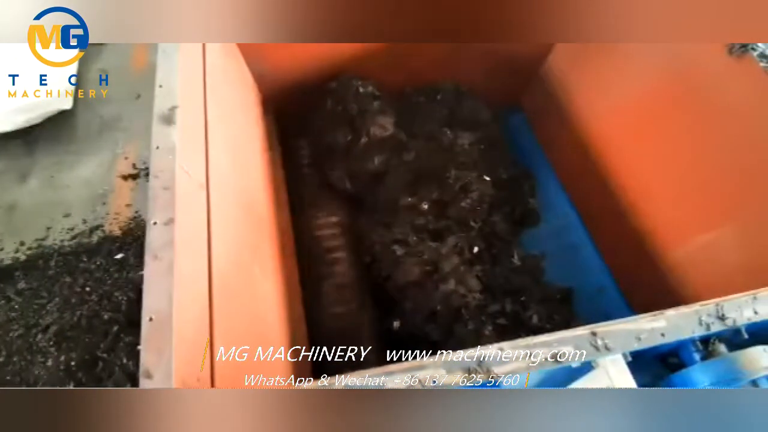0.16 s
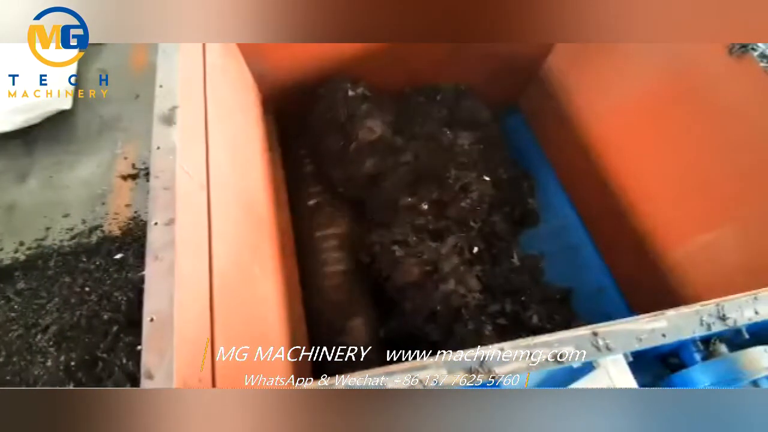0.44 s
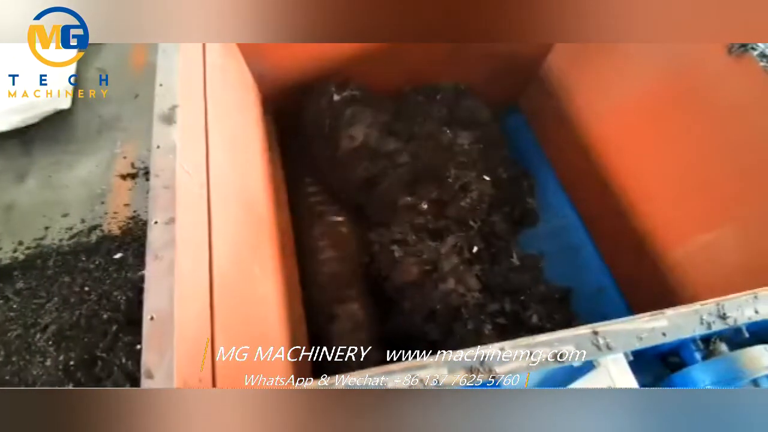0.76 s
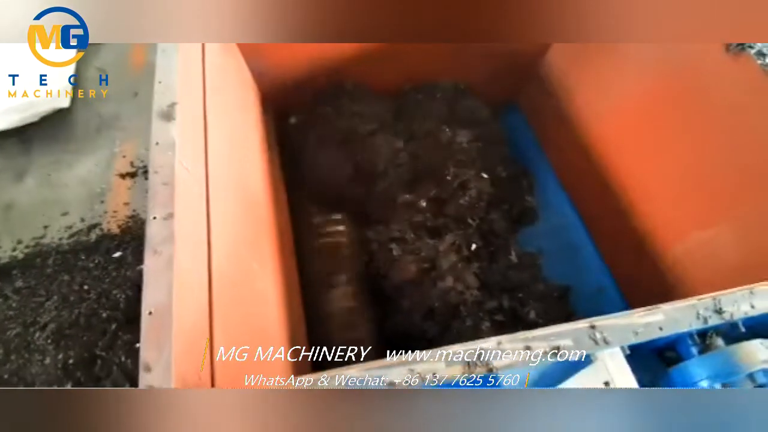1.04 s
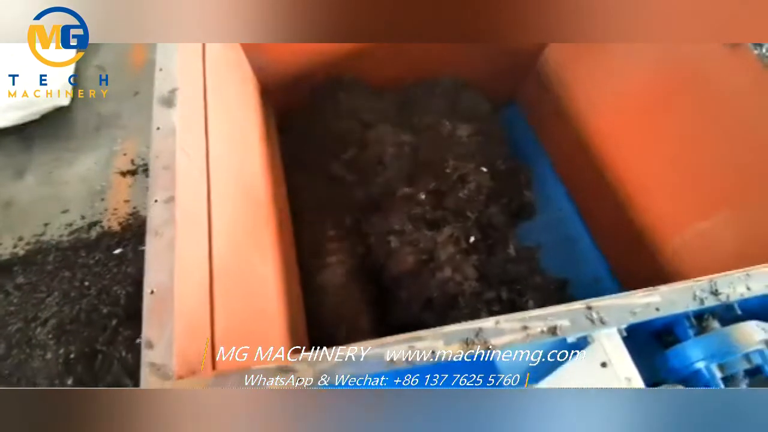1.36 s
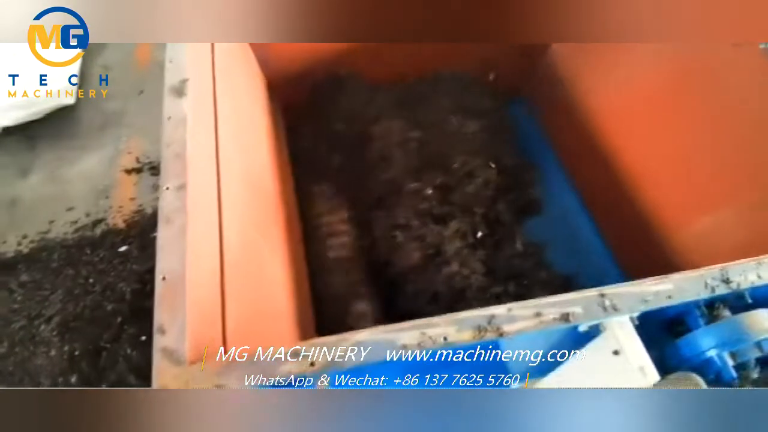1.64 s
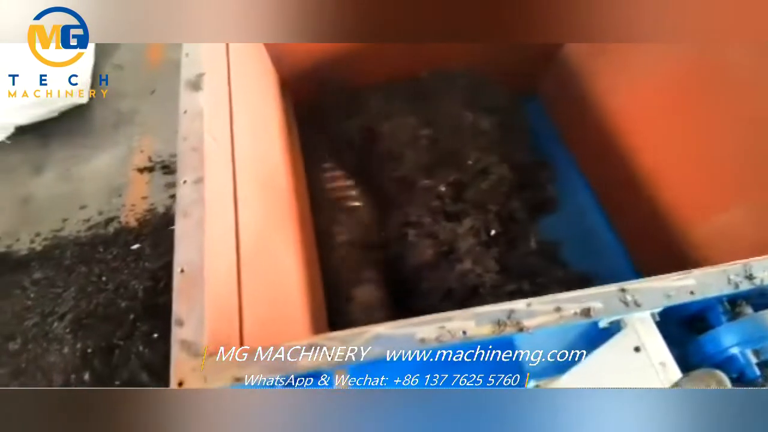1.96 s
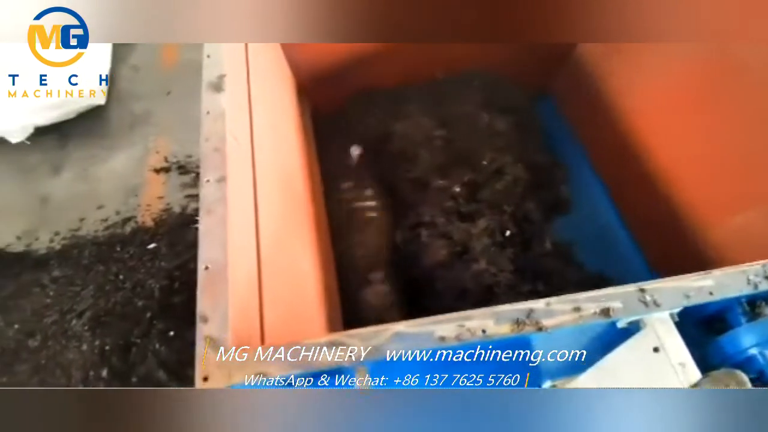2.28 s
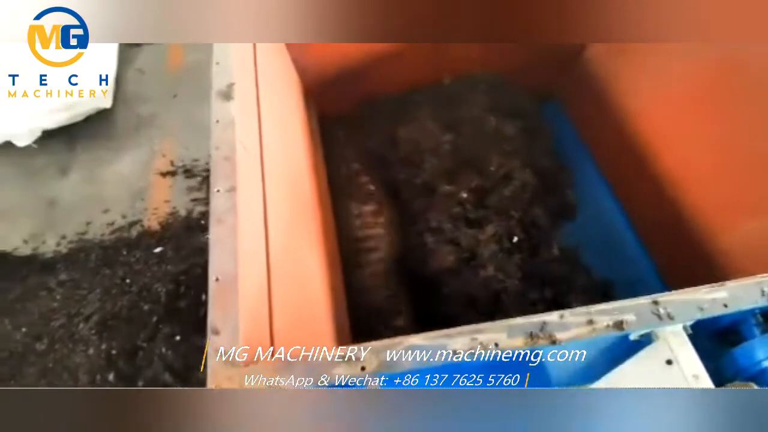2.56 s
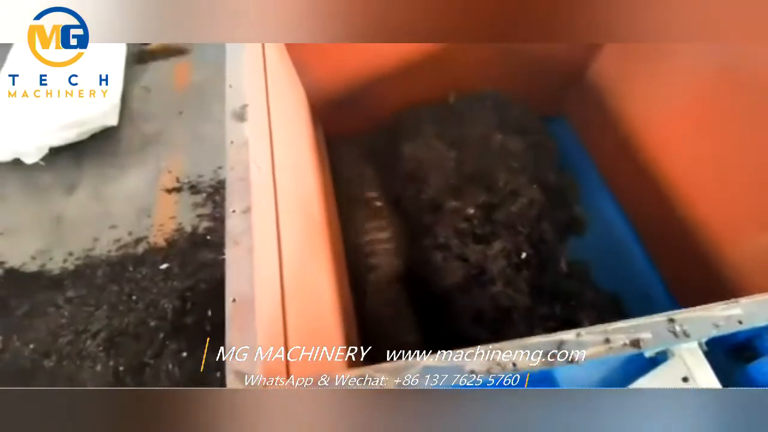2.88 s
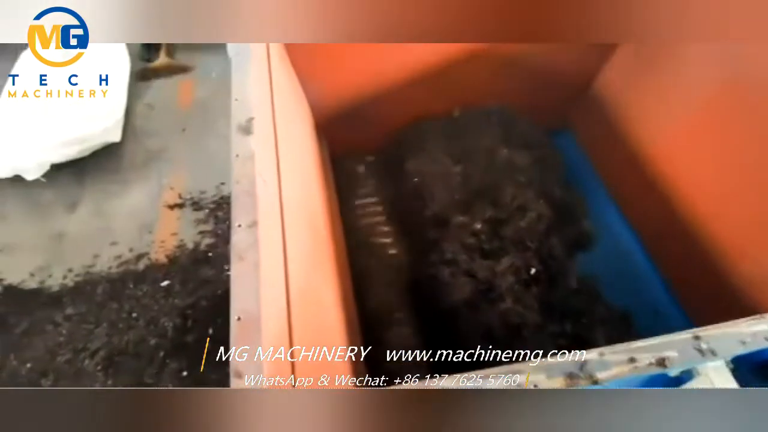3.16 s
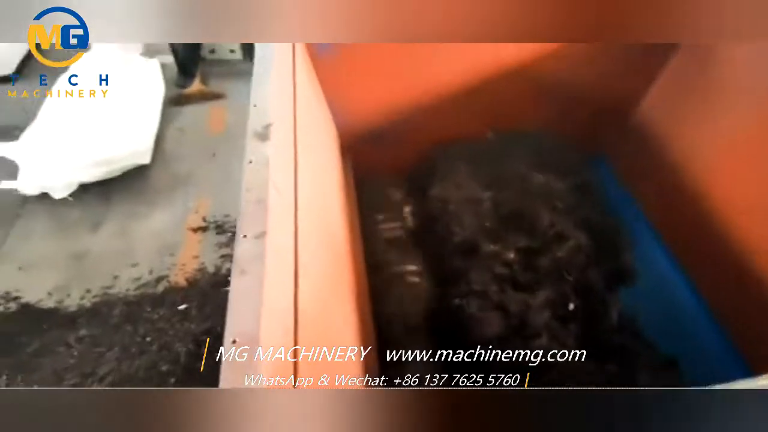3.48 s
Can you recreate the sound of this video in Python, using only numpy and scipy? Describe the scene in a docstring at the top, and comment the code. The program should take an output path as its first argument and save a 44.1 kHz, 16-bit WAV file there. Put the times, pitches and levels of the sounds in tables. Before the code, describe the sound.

Close, gritty roar of an industrial shredder, with sharp random cracks and dull knocks of material.

```python
"""Shredder at close range

A single-rotor shredder runs in a workshop, heard close above the hopper through two hand-held ports.
Noise rumbles in the housing and hisses as six knife rows a turn grind chips; sines make gear buzz and whine.
Lumps crack on the knives (bright noise bursts), some thud on the hopper (decaying sines) and one rubs its wall
(narrow noise). The ports colour grinding, buzz and cracks; a limiter ducks everything around loud peaks."""
import sys
import numpy as np
from scipy import signal
from scipy.fft import rfft, irfft, next_fast_len
from scipy.io import wavfile
from scipy.ndimage import minimum_filter1d

SR = 44100
rng = np.random.default_rng(int(sys.argv[2]) if len(sys.argv) > 2 else 0)


def to_wav(s):
    """Save 16-bit WAV."""
    ch = np.atleast_2d(s).T  # columns
    pcm = np.round(np.clip(ch, -1, 1) * 32767)  # PCM
    wavfile.write(sys.argv[1], SR, pcm.astype(np.int16))


N = 159642
TIME_S = np.arange(N) / SR
TURNS_PER_S = 5.835

# Treble colour of the two ports. Each row: frequency in Hz, left gain in dB, right gain in dB.
PORT_COLOUR = [(685, -33, -31), (1130, -12, -12), (1430, -16, -14), (1680, -14, -15), (2300, -12, -12),
               (2750, -16, -12.5), (3780, -18, -12), (5070, -18, -3), (5800, -10, 0), (6600, -11, -4),
               (7300, -8, -9.5), (8000, -2, -12.5), (8400, -2, -14.5), (8800, -6, -17), (9300, -11, -22),
               (10180, -17.5, -25), (11050, -20, -29.5), (11840, -30, -46), (14200, -31.5, -56),
               (15000, -35, -64), (15700, -42, -70)]


def amp(db):
    """dB to gain."""
    return 10 ** (np.asarray(db) / 20)


def unit(x):
    """Scale to rms 1."""
    return x / np.sqrt(np.mean(x ** 2))


def in_time(rows):
    """Columns of a table as curves, one value per sample."""
    s, *columns = np.transpose(rows)
    return [np.interp(TIME_S, s, column) for column in columns]


def at_hz(points, hz):
    """Columns of a spectrum read on a log-frequency axis."""
    f, *columns = np.transpose(points)
    return np.array([np.interp(np.log(hz + 1), np.log(f), column) for column in columns])


def sides(pan_db):
    """Left and right gain of a left-minus-right balance in dB."""
    return amp(np.outer([.5, -.5], pan_db))


def drift(rate):
    """Random wander of rms 1: noise through two equal one-pole lowpasses with corners at rate, in Hz."""
    step = 40   # samples between the drawn values
    r = np.exp(-2 * np.pi * rate * step / SR)
    noise = rng.standard_normal(N // step + 2002)
    slow = signal.lfilter([1], [1, -2 * r, r * r], noise)[2000:]   # drop the settling
    return np.interp(np.arange(N) / step, np.arange(len(slow)), unit(slow))


def colour(x, spectrum):
    """Filter the channels by a dB spectrum."""
    size = next_fast_len(N + SR // 10)
    gain = amp(at_hz(spectrum, np.fft.rfftfreq(size, 1 / SR)))
    return irfft(rfft(x, size) * gain, size)[:, :N]


def pair():
    """White noise in two ports, alike in the bass, nearly unrelated through most of the treble."""
    # Each row: frequency in Hz, left-right correlation from -1 to 1.
    likeness = [(60, 1), (130, 0.97), (290, 0.98), (640, 0.86), (1410, -0.1), (3100, -0.034),
                (6820, -0.013), (15000, -0.19)]
    mid, side = rfft(rng.standard_normal((2, N)))
    alike = np.clip(at_hz(likeness, np.fft.rfftfreq(N, 1 / SR)), -1, 1)
    shared = np.sqrt(.5 + alike / 2) * mid
    opposed = np.sqrt(.5 - alike / 2) * side
    return irfft(shared + opposed * [[1], [-1]], N)


def patchy(x, edges_hz, patchy_db, rate):
    """Split into bands; each flickers partly alone, partly with all."""
    spectrum, hz = rfft(x), np.fft.rfftfreq(N, 1 / SR)
    together, out = drift(rate), 0
    for low, high in zip(edges_hz, edges_hz[1:]):
        band = irfft(spectrum * ((hz >= low) & (hz < high)), N)
        out = out + band * amp(patchy_db * (0.35 * together + drift(rate)))
    return out


def knife_swell():
    """Gain that swells in a rounded hump as each knife row passes, a little unevenly."""
    # Swell of each of the six knife rows in turn, in dB.
    rows_db = [1.6, 0.32, 0.78, 0.75, 0.75, 0.45]
    first_knife_s, width_s, uneven_db = 0.0031, 0.0075, 1
    rows_per_s = TURNS_PER_S * len(rows_db)
    passes = (TIME_S - first_knife_s) * rows_per_s
    near = np.round(passes).astype(int)
    count = near.max() + 1
    swell_db = np.resize(rows_db, count) + uneven_db * rng.standard_normal(count)
    hump = np.exp(-((passes - near) / (rows_per_s * width_s)) ** 2)
    return amp(swell_db[near] * hump)


def small_chips(swell):
    """Chips snap at random, more often as the knives swell; each is a short decaying noise."""
    chips_per_s, spread_db, decay_s = 300, 3.5, .002   # rate is at a swell of 0 dB
    born = rng.random(N) < chips_per_s * swell ** 2 / SR
    sizes = born * amp(spread_db * np.minimum(rng.exponential(1, N), 5))
    return signal.lfilter([1], [1, -np.exp(-1 / (decay_s * SR))], sizes) * pair()


def gear_buzz():
    """Gear teeth meshing: sines at multiples of a wandering tooth rate, each wavering at each port."""
    # Each row: multiple of the tooth rate, left level in dB, right level in dB,
    # before the port colour and the buzz level.
    partials = [(3, -11, -10), (6, -13, -14), (9, -9, -10), (14, -17, -22), (15, -17, -22), (17, -21, -20),
                (18, -12, -8), (19, -18, -18), (20, -7, -10.5), (21, -16, -14), (23, -16, -15),
                (24, -18, -14), (25, -17, -16), (26, -11.5, -9.5), (27, -18, -18), (30, -15, -18)]
    # Each row: time in seconds, level of the whole buzz in dB.
    buzz_level = [(0, 1.5), (1.0, 4.5), (1.8, -4), (2.3, 2.5), (2.8, -6), (3.62, 0)]
    teeth, wander_hz, waver_db = 55, .3, 2.0
    tooth_hz = TURNS_PER_S * teeth + wander_hz * drift(3.74)
    phase = 2 * np.pi * np.cumsum(tooth_hz) / SR
    buzz = 0
    for multiple, left_db, right_db in partials:
        waver = waver_db * np.array([drift(1.5), drift(7.3)])
        tone = np.sin(multiple * phase + rng.uniform(0, 2 * np.pi, (2, 1)))
        buzz = buzz + amp(np.array([[left_db], [right_db]]) + waver) * tone
    return amp(in_time(buzz_level)[0]) * colour(buzz, PORT_COLOUR)


def turn_left_port(sound):
    """The hand turns the left port away, a crossfade to a sound with its upper treble cut."""
    # Each row: frequency in Hz, gain once turned in dB.
    turned_colour = [(1000, 1.5), (2500, -2), (4500, 0), (6500, -2.5), (7700, -5.5), (8700, 0.5),
                     (10000, -0.5), (12000, -9), (15000, -24)]
    start_s, lasts_s = 1.87, 0.32
    turned = np.clip((TIME_S - start_s) / lasts_s, 0, 1)
    left = (1 - turned) * sound[0] + turned * colour(sound[:1], turned_colour)[0]
    return np.array([left, sound[1]])


def grinding():
    """Hiss flickers by band and swells with each knife row, joined by snapping chips and the gear buzz."""
    # Each row: time in seconds, level in dB, left-minus-right balance in dB.
    grind_level = [(0, -34, 1.5), (.4, -33.5, -0.5), (.8, -33, 1), (1.2, -33, -0.5), (1.6, -32.5, -1),
                   (2.05, -32, 0), (2.25, -34, -4), (2.6, -33.5, -2.5), (3.0, -34, -3.5),
                   (3.35, -35.5, -3.5), (3.5, -37, -3.5), (3.62, -38.5, -5.5)]
    chips_db, patchy_db = -12.5, 1.0
    swell = knife_swell()
    hiss = patchy(pair(), np.geomspace(500, 16500, num=13), patchy_db, rate=15.4)
    chips = amp(chips_db) * unit(small_chips(swell))
    ground = unit(colour(hiss * swell + chips, PORT_COLOUR))
    level_db, pan_db = in_time(grind_level)
    return amp(level_db) * sides(pan_db) * turn_left_port(ground + gear_buzz())


def drive_hums():
    """Low sines of the drive whose level and pitch waver."""
    # Each row: pitch in Hz, rms level in dB before the waver.
    hum_table = [(151, -43), (576, -58)]
    waver_db, wander = 3, 0.0053   # wander as a share of the pitch
    hums = 0
    for hz, db in hum_table:
        level = amp(db + waver_db * drift(21.0))
        phase = 2 * np.pi * hz * np.cumsum(1 + wander * drift(6.35)) / SR
        hums = hums + level * np.sqrt(2) * np.sin(phase)
    return hums


def rumble():
    """Noise shaped by the housing, flickering by band, with the hums of the drive."""
    # Each row: time in seconds, level in dB.
    rumble_level = [(0.0, -36), (0.21, -36), (0.41, -36.5), (0.93, -35), (1.35, -35), (1.75, -34.5),
                    (2.52, -35), (2.78, -35.5), (3.37, -37.5), (3.47, -37), (3.62, -38.5)]
    # Each row: frequency in Hz, relative gain in dB.
    housing_colour = [(13, -58), (22, -36), (49, -23), (108, -6.5), (146, -8), (174, -3.5), (200, -2),
                      (243, -5.5), (311, -0.5), (392, -5.5), (511, -15), (578, -11.5), (702, -19.5),
                      (948, -18.5), (1400, -27.5), (1950, -23), (3300, -120)]
    patchy_db = .9
    noise = patchy(pair(), np.geomspace(15, 1800, num=13), patchy_db, rate=14.5)
    level_db, = in_time(rumble_level)
    return amp(level_db) * unit(colour(noise, housing_colour)) + drive_hums()


def whine():
    """A thin, slowly sagging motor sine whose level wavers; a fainter one just above makes it beat."""
    # Each row: time in seconds, level in dB before the waver, left-minus-right balance in dB.
    whine_level = [(0, -45, 1), (.3, -47, 3), (.6, -44, 0), (.95, -46, 8), (1.11, -43.5, 0),
                   (1.16, -50.5, -0.5), (1.35, -50, 0), (1.5, -45.5, 1), (1.7, -50.5, 0), (1.8, -52, -3),
                   (1.95, -52.5, -6), (2.15, -53, -4), (2.28, -47.5, -6), (2.42, -47, 2), (2.55, -55, 2),
                   (2.8, -62, -8), (3.05, -58, -9), (3.25, -47, 5), (3.36, -57, 4), (3.44, -52, 4),
                   (3.53, -57, -2), (3.62, -49, -11)]
    start_hz, sag_hz_per_s = 1709.5, 1.4
    companion_above_hz, companion_db = 27, -10
    waver_db, left_phase_rad = 1.8, 4.7   # phase offset of the left port
    hz = start_hz - sag_hz_per_s * TIME_S
    tones = 0
    for above_hz, db in [(0, 0), (companion_above_hz, companion_db)]:
        phase = 2 * np.pi * np.cumsum(hz + above_hz) / SR
        tones = tones + amp(db + waver_db * drift(34.0)) * np.sin(phase + [[left_phase_rad], [0]])
    level_db, pan_db = in_time(whine_level)
    return amp(level_db) * sides(pan_db) * tones


def cracks():
    """Lumps on the knives: ticks and ragged bursts of bright noise, with a quiet tail of the room after."""
    # Each row: start in seconds, level in dB before the band filter and port colour,
    # left-minus-right balance in dB, length in seconds.
    crack_table = [(0.126, -17.5, 2.5, 0.016), (.291, -20, 6, 0.006), (0.35, -32, 0, 0.005),
                   (0.549, -21, 7, 0.053), (0.746, -14.5, -2.5, 0.0045), (0.922, -16.5, -1, 0.012),
                   (1.064, -20, -2, 0.071), (1.106, -19, 9, .004), (1.15, -19, 2, 0.0088),
                   (1.167, -16, -1, 0.0051), (1.245, -18, 0, 0.002), (1.315, -14, 0, 0.008),
                   (1.405, -23, 5, .008), (1.514, -19.5, 0.5, 0.011), (1.628, -15, 4, 0.011),
                   (1.8008, -15.5, 3, 0.0069), (1.835, -20, 0, 0.0081), (1.859, -15, 2, 0.006),
                   (2.205, -26.5, -11, 0.034), (2.3745, -16.5, 5, 0.0087), (2.437, -19, -4, 0.0078),
                   (2.488, -20, 3, 0.01), (2.657, -17, 4, 0.0065), (2.715, -18, -8, 0.0075),
                   (2.7462, -4.5, -3, 0.0061), (2.792, -24, -4, .003), (2.809, -18, -9, 0.0049),
                   (2.888, -25, -11, .008), (2.9158, -5.5, 1, .006), (2.977, -27, -6, 0.016),
                   (3.076, -31, -4, 0.0031), (3.0876, -15, 2, 0.0027), (3.091, -13, 2, 0.0028),
                   (3.113, -30, -4, .003), (3.144, -23.5, -14, .008), (3.2636, -13, 6, 0.008),
                   (3.317, -19.5, -12, 0.0079), (3.428, -26, -4, 0.0027), (3.454, -20, -3, .004),
                   (3.495, -18, -2, 0.0044)]
    # Sag over the length of a crack in dB: left row, then right row.
    sag_db = [
        [12.0],
        [6.0],
    ]
    attack_s, fade_s, ragged_db = 0.00093, 0.003, 2.5
    tail_db, tail_s = -21, 0.056   # level against the crack, decay time constant
    tick_db, tick_s = 2, .002      # the same for the tick of a hard crack
    tick_follows, hard_crack_db = .8, -10   # dB of tick lost per dB that a crack is below hard
    low_hz, high_hz = 3570, 10600
    envelope = np.zeros((2, N + SR))
    t = np.arange(SR // 5) / SR
    for s, db, pan_db, length in crack_table:
        burst = amp(-np.array(sag_db) * t / length) * np.exp(-np.maximum(t - length, 0) / fade_s)
        tail = amp(tail_db) * np.exp(-t / tail_s)
        tick = amp(tick_db + tick_follows * min(db - hard_crack_db, 0)) * np.exp(-t / tick_s)
        shape = np.minimum(t / attack_s, 1) * (burst + tail + tick)
        start = int(s * SR)
        envelope[:, start:start + len(t)] += amp(db) * sides([pan_db]) * shape
    ragged_noise = amp(ragged_db * drift(270.0)) * pair()
    band = signal.butter(4, [low_hz, high_hz], "band", fs=SR, output="sos")
    return colour(signal.sosfilt(band, envelope[:, :N] * ragged_noise), PORT_COLOUR)


def thuds():
    """Some lumps thud on the hopper: each thud is a decaying sine with a soft rise at its own pitch."""
    # Each row: start in seconds, level in dB before the rise and decay, pitch in Hz.
    thud_table = [(0.164, -22.5, 222), (0.523, -16, 217), (0.633, -19, 282), (0.844, -22, 157),
                  (0.979, -36, 159), (1.086, -24, 243), (1.195, -16.5, 198), (1.349, -17, 152),
                  (1.701, -15, 441), (1.876, -16, 292), (1.924, -17, 340), (1.97, -18.5, 336),
                  (2.008, -12.5, 294), (2.084, -17, 157), (2.341, -16.5, 192), (2.488, -16.5, 300),
                  (2.662, -11, 338), (2.677, -18, 312), (2.776, -19, 312), (2.949, -14.5, 339),
                  (3.174, -21, 150), (3.234, -14.5, 300), (3.484, -16.5, 299)]
    t60_s, rise_s = 0.056, 0.0048   # time to fall 60 dB, time constant of the rise
    out, t = np.zeros(N + SR), np.arange(SR // 5) / SR
    for s, db, hz in thud_table:
        envelope = amp(db - 60 * t / t60_s) * (1 - np.exp(-t / rise_s))
        start = int(s * SR)
        out[start:start + len(t)] += envelope * np.sin(2 * np.pi * hz * t)
    return out[:N]


def squeak():
    """A lump rubs on the wall: narrow noise under a rounded swell."""
    start_s, length_s = 1.055, .055
    centre_hz, width_hz, level_db = 2365, 70, -38
    edges_hz = [centre_hz - width_hz / 2, centre_hz + width_hz / 2]
    band = signal.butter(2, edges_hz, "band", fs=SR, output="sos")
    part = np.clip((TIME_S - start_s) / length_s, 0, 1)
    return amp(level_db) * np.sin(np.pi * part) * unit(signal.sosfilt(band, pair()))


def scene():
    """All sources at the two ports."""
    return grinding() + rumble() + whine() + cracks() + thuds() + squeak()


def record(dry):
    """A look-ahead limiter ducks both ports together around loud peaks; a steep lowpass cuts the top."""
    ceiling_db, squeeze = -11.5, 0.85   # squeeze: share of the excess taken off
    release_db_per_s, attack_s, ahead_s = 171, 0.0013, 0.011
    cutoff_hz = 15730
    peak_db = 20 * np.log10(np.abs(dry).max(0) + 1e-9)
    over_db = np.maximum(peak_db - ceiling_db, 0)
    # after each peak the excess falls at a constant rate in dB
    fall = release_db_per_s * TIME_S
    held = np.maximum(np.maximum.accumulate(over_db + fall) - fall, 0)
    # the largest excess within the look-ahead window
    half = int(ahead_s * SR / 2)
    ahead = -minimum_filter1d(-held, 2 * half + 1, origin=-half)
    r = np.exp(-1 / (attack_s * SR))
    duck_db = squeeze * signal.lfilter([1 - r], [1, -r], ahead)
    lowpass = signal.ellip(12, .5, 70, cutoff_hz, fs=SR, output="sos")
    return signal.sosfilt(lowpass, dry * amp(-duck_db))


dry = scene()
out = record(dry)
to_wav(out)
```